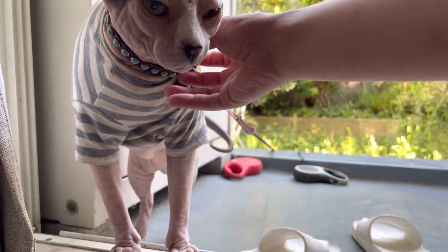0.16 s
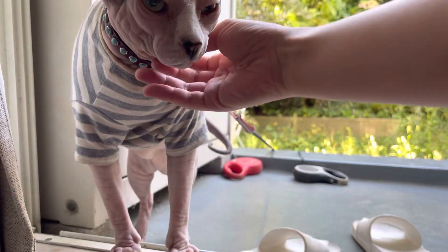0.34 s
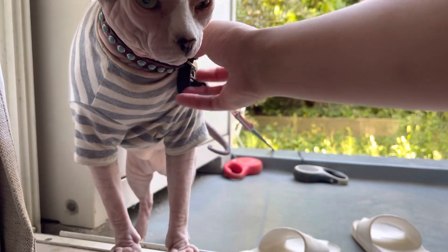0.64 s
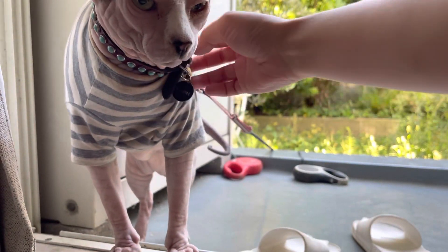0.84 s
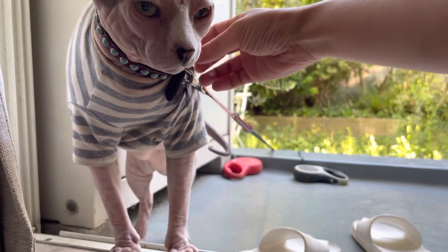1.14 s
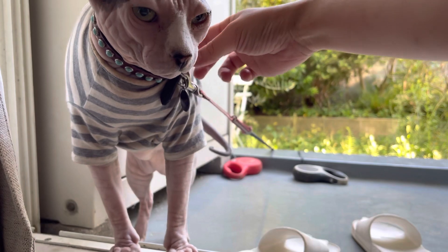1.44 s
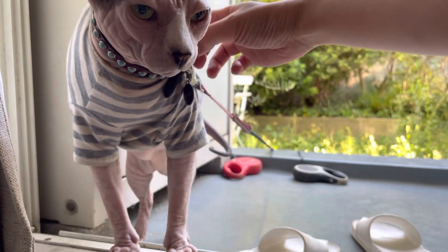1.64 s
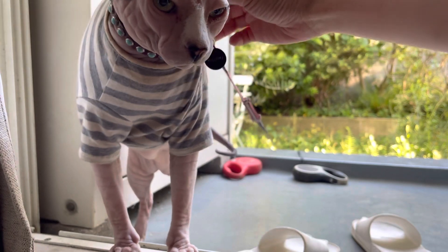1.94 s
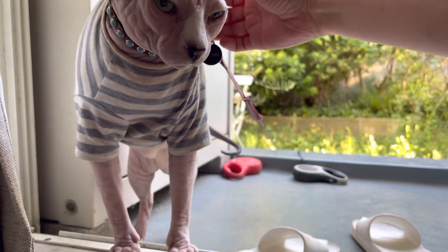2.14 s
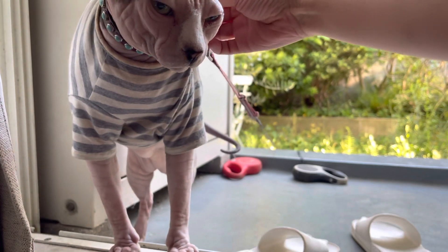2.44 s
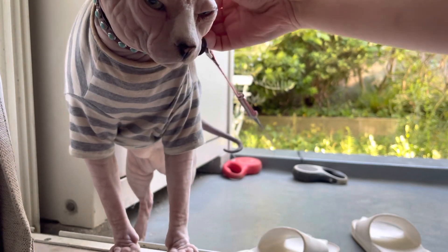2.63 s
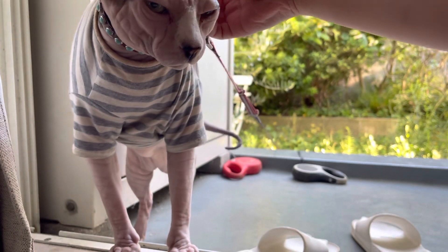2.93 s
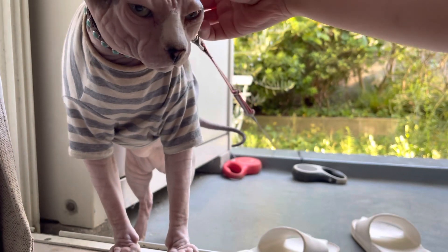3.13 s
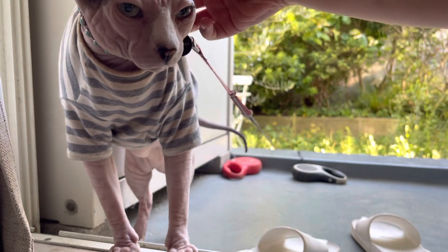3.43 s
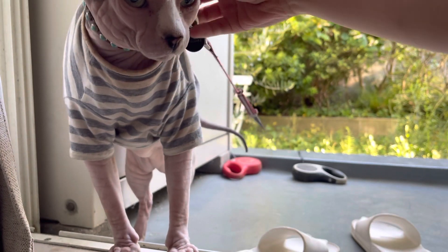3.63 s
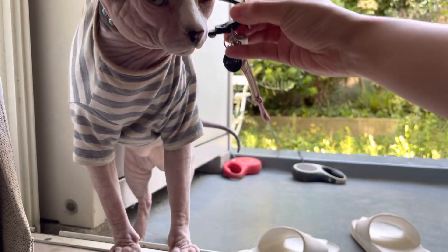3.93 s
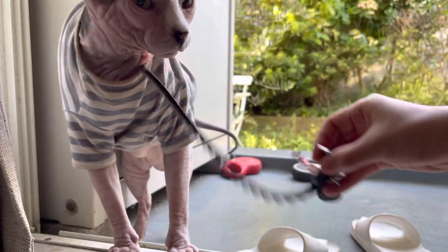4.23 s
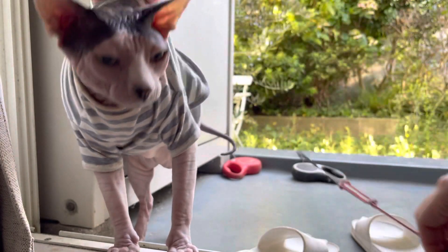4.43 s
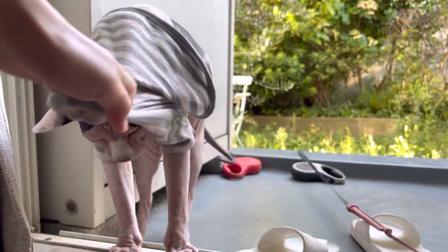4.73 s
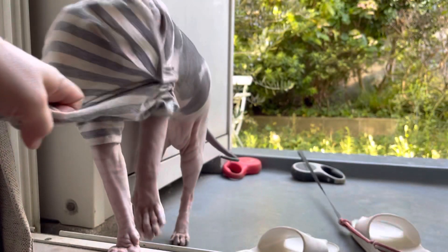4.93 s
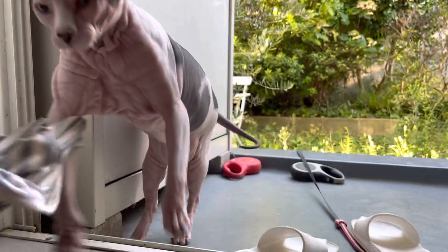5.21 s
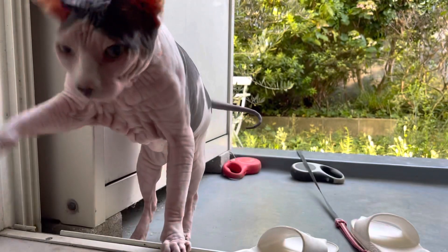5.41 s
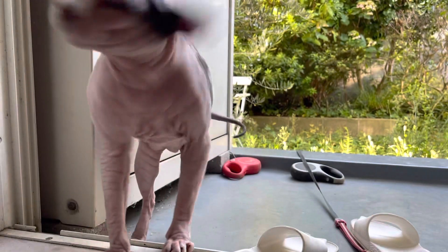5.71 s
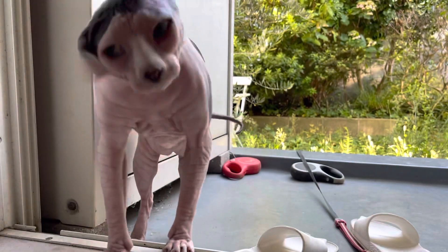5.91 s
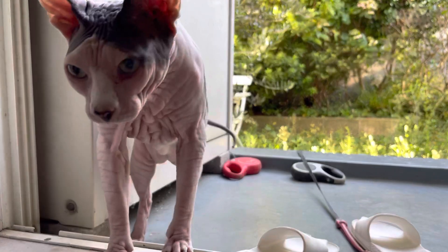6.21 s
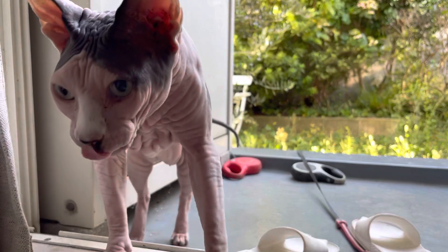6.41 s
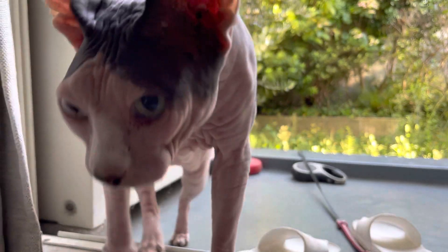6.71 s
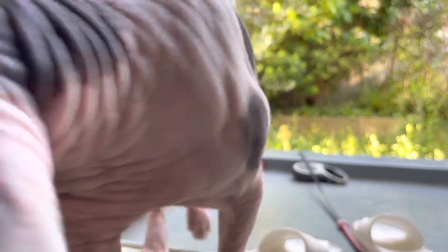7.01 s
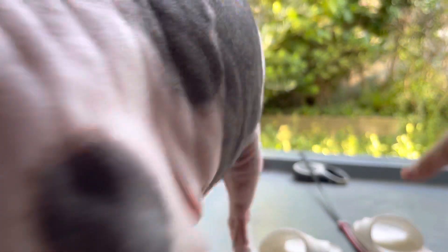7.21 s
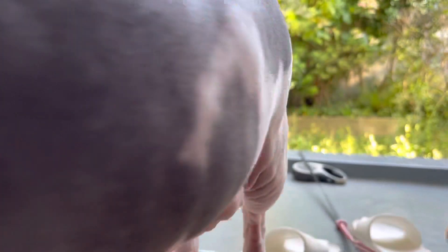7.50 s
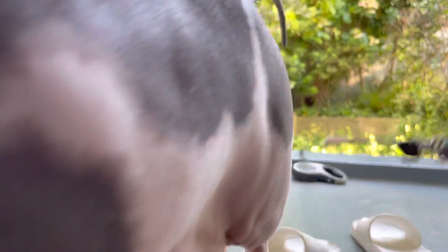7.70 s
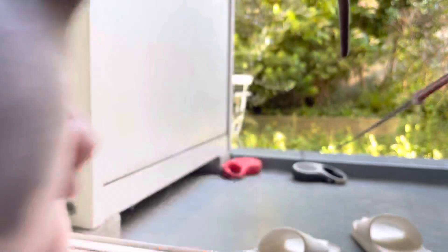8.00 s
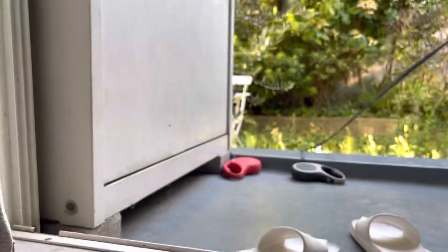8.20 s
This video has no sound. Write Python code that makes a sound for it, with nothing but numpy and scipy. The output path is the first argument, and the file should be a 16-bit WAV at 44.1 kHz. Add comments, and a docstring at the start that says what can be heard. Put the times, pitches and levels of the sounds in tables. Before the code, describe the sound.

Quiet doorway with light tag jingles and a low passing engine, then sharp buckle clatter, scraping, cloth rustle, claw clicks and a soft paw thud.

```python
"""Cat sheds collar and shirt in a balcony doorway.

A hand takes them off: the tag ticks, the collar drops, its buckle and leash clip clack and drag over the hollow sill.
Cloth rustles; claws click and paws thud as the cat steps in. Outside a motor vehicle pulls away, an insect chirps
faintly and a fan hums. Hits are noise bursts plus decaying modes, rubs and air are shaped noise, the engine and fan
are sines; a short tail and two microphone ports follow."""
import sys
import numpy as np
from scipy import signal
from scipy.fft import rfft, irfft, next_fast_len
from scipy.io import wavfile
from scipy.ndimage import map_coordinates

SR = 44100
rng = np.random.default_rng(int(sys.argv[2]) if len(sys.argv) > 2 else 0)


def output_pcm(signal):
    """Save a mono or channel-first signal as 16-bit PCM at the path in sys.argv[1].

    Samples are clipped to [-1, 1] before scaling.
    """
    pcm = np.clip(np.atleast_2d(signal).T, -1, 1) * 32767
    wavfile.write(sys.argv[1], SR, np.round(pcm).astype(np.int16))


N = 368235
AGE_S = np.arange(SR // 6) / SR  # time since a contact
SIDES = np.array([[.5], [-.5]])  # left and right share of a difference between the ports


def amp(db):
    """Decibels to amplitude."""
    return 10 ** (np.asarray(db) / 20)


def unit(x):
    """Scale to rms 1."""
    return x / np.sqrt(np.mean(x ** 2) + 1e-20)


def along(points, hz):
    """Interpolate (Hz, value) points on a log axis."""
    f, v = np.transpose(points)
    return np.interp(np.log(hz + 1), np.log(f + 1), v)


def curves(rows):
    """One value per sample for each column after the time."""
    s, *cols = np.transpose(rows)
    return [np.interp(np.arange(N) / SR, s, c) for c in cols]


def wobble(rate_hz, size=16):
    """A smooth random curve with rate_hz knots a second."""
    coarse = np.arange(0, N, size)
    knots = rng.standard_normal(int(N * rate_hz / SR) + 4)
    return np.interp(np.arange(N), coarse, map_coordinates(knots, [coarse * rate_hz / SR]))


def filtered(x, response):
    """Multiply the spectrum of x by a response of frequency."""
    m = next_fast_len(N + SR // 2)
    return irfft(rfft(x, m) * response(np.fft.rfftfreq(m, 1 / SR)), m)[..., :N]


def pair(width, size):
    """White noise for two ports; width is side over mid."""
    mid, side = rng.standard_normal((2, size))
    return np.array([mid + width * side, mid - width * side])


def coloured(x, spectrum):
    """x shaped by a spectrum, at rms 1."""
    return unit(filtered(x, lambda hz: amp(along(spectrum, hz))))


def swell(start_s, length_s, attack_s, release_s):
    """An envelope that rises linearly, holds to the end of its length and dies away exponentially."""
    t = np.arange(N) / SR - start_s
    return np.clip(t / attack_s, 0, 1) * np.exp(-np.clip((t - length_s) / release_s, 0, 50))


def swells(rows, attack_s, release_s):
    """The joint envelope of (start, length, dB) rows, summed as power."""
    power = sum((amp(db) * swell(start_s, length_s, attack_s, release_s)) ** 2 for start_s, length_s, db in rows)
    return np.sqrt(power)


def blow(x):
    """Scale a hit to the energy of 10 ms at rms 1."""
    return x / np.sqrt(np.mean(np.sum(x ** 2, axis=-1)) / (SR / 100) + 1e-20)


CONTACT_RISE_S, SNAP_DB = .0004, 13


def crack(lo_hz, hi_hz, t60_s, after_db=-15, after_t60_s=0.12, width=0.51):
    """First contact and a burst in one band, followed by the diffuse answer of nearby surfaces."""
    direct = pair(width, len(AGE_S)) * amp(-60 * AGE_S / max(t60_s, .002))
    direct[:, SR // 1000] += amp(SNAP_DB)  # first contact
    after = pair(0.97, len(AGE_S)) * amp(after_db - 60 * AGE_S / after_t60_s)
    band = signal.butter(3, [lo_hz, min(hi_hz, SR / 2 - 1)], 'band', fs=SR, output='sos')
    rise = 1 - np.exp(-AGE_S / CONTACT_RISE_S)
    return blow(signal.sosfilt(band, (direct + after) * rise))


def ring(modes, scatter_db=3, detune=0.0038, attack_s=0.00032):
    """Decaying modes, struck at new strengths and slightly new pitches by each contact."""
    out = np.zeros((2, len(AGE_S)))
    for hz, db, t60_s in modes:
        phase = 2 * np.pi * hz * (1 + detune * rng.normal()) * AGE_S + rng.normal(0, 0.4, (2, 1))
        out += amp(db + scatter_db * rng.normal() - 60 * AGE_S / t60_s) * np.sin(phase)
    return blow(out * (1 - np.exp(-AGE_S / attack_s)))


def add(track, s, hit):
    """Place a hit at time s."""
    part = track[:, round(s * SR):][:, :hit.shape[1]]
    part += hit[:, :part.shape[1]]


# town air spectrum: (frequency [Hz], relative density [dB per Hz])
AIR_SPECTRUM = [(13, -47.5), (22, -11.5), (42, -6), (97, 1), (128, -5), (178, -3.5), (301, -18),
                (333, -11.5), (387, -18.5), (511, -25.5), (1470, -36.5), (1710, -41), (4560, -54),
                (7360, -49.5), (9000, -43.5), (11700, -71), (19800, -120)]
# fan tones: (frequency [Hz], mean level [dB])
FAN_TONES = [(89, -60), (175, -64.5), (334, -59.5), (363, -62.5)]
# distant traffic: (time [s], rise [dB]); the near-mono air takes half of it
TRAFFIC = [(0, -0.5), (2.2, 1.5), (5.5, 6.5), (6.3, 0.5)]
FIRST_CHIRP_S, CHIRP_PERIOD_S, CHIRPS = 0.196, .329, 7


def background():
    """Distant town air as shaped noise, a fan's wavering tones and a faint insect's noise pulses."""
    t = np.arange(N) / SR
    air = amp(-49.0 + 1.6 * wobble(6.2)) * coloured(pair(0.088, N), AIR_SPECTRUM)
    wide_spectrum = [(25, -31), (70, -11.5), (250, -5), (600, -10.5), (2500, -20.0), (5000, -29.5), (12000, -36.5)]
    wide = amp(-61.5) * coloured(pair(0.63, N), wide_spectrum)
    fan = np.zeros(N)
    for hz, db in FAN_TONES:
        level = amp(db + 1.3 * wobble(2.8)) * np.sqrt(2)
        fan += level * np.sin(2 * np.pi * hz * t + .5 * wobble(7.1))
    chirp_times_s = FIRST_CHIRP_S + CHIRP_PERIOD_S * np.arange(CHIRPS)
    chirping = sum(np.exp(-((t - s) / 0.034) ** 2) for s in chirp_times_s)
    chirp_noise = coloured(pair(0.59, N), [(5700, -61), (6250, 2), (6500, -9), (7000, -60)])
    insect = amp(-73) * chirping * chirp_noise
    town_db, = curves(TRAFFIC)
    return amp(town_db / 2) * air + amp(town_db) * wide + fan + insect


# exhaust harmonics: (frequency [Hz], relative level [dB])
PIPE_LEVELS = [(130, -7.5), (177, 4.5), (220, -3), (265, -2.5), (310, 3.5), (360, -7), (400, -6), (445, -6),
               (490, -6), (535, -3), (580, -6.5), (625, -9.5), (670, -5), (715, -8), (770, -16.5),
               (850, -12), (892, -2.5), (935, -12.5), (980, -10.5), (1050, -25), (1200, -15.5),
               (1340, -16.5), (1550, -18.5), (1750, -33.5), (2300, -17), (2600, -59)]
# engine: (time [s], firing rate [Hz])
FIRING_RATE = [(1.8, 45.57), (1.89, 48.5), (2.03, 57.9), (2.15, 71.55), (2.31, 82.24), (2.42, 86.7),
               (2.56, 88.34), (2.85, 89.06), (3.13, 87.64), (3.25, 89), (3.37, 97.9), (3.65, 101.6),
               (3.7, 100.5), (3.79, 90.5), (3.95, 84.8), (4.2, 79)]
ENGINE_ATTACK_S, ENGINE_RELEASE_S = .13, 0.12
FADE_HZ, LUG_HARMONICS_DB = 208, 3.5  # above FADE_HZ harmonics carry less far; load makes them louder


def harmonics(turn, firing_hz, near, labour, size=200):
    """The exhaust's upper harmonics; street echoes give each its own fading and its own phase at each port."""
    start_s, end_s = FIRING_RATE[0][0], FIRING_RATE[-1][0] + 2 * ENGINE_RELEASE_S
    span = np.arange(round(start_s * SR), round(end_s * SR))
    at = span[::size]
    drift = lambda: np.interp(at, np.linspace(at[0], at[-1], num=22), rng.standard_normal(22))
    out = np.zeros((2, N))
    for k in range(3, 56):  # multiples of half the firing rate
        hz = k * firing_hz[at] / 2
        carry = near[at] ** np.minimum((hz / FADE_HZ) ** 2, 6)  # high harmonics fade faster with distance
        gain = carry * amp(along(PIPE_LEVELS, hz) + 3.8 * drift() + LUG_HARMONICS_DB * labour[at])
        echo_phase = np.interp(span, at, rng.uniform(0, 2 * np.pi) + .9 * drift())
        phase = k * turn[span] + echo_phase + rng.normal(0, 0.54, (2, 1))
        out[:, span[0]:span[-1] + 1] += np.interp(span, at, gain) * np.sin(phase.astype(np.float32))
    return out


# street's carrying of the exhaust note: (frequency [Hz], gain [dB])
STREET_BOOM = [(45, -7), (52, 1), (61, -6), (72, -3), (77, -5), (85, 3), (90, -3.5), (98, 8.5), (104, -10)]
# roar spectrum: (frequency [Hz], relative level [dB])
ROAR_SPECTRUM = [(60, -28), (150, -14), (330, -8), (650, -8), (780, -14), (920, -8), (1100, -13),
                 (1500, -9.5), (1800, -16.5), (2300, -12.5), (2600, -17), (4500, -25.5), (8000, -25.5),
                 (12000, -40.5)]
# clatter, moving off and labouring: (start [s], length [s], level [dB])
CLATTER_BURSTS = [(1.83, 0.22, -58), (3.3, 0.24, -65)]
CLATTER_ATTACK_S, CLATTER_RELEASE_S = 0.028, 0.16
PULL_AWAY_S, DRIVE_S = 1.809, 2.21  # vehicle in earshot
NEAREST_S, PASS_S = 2.85, 1  # closest approach, time from there to 3 dB down
LUG_S, LUG_LENGTH_S, LUG_RAMP_S = 3.22, 0.5, 0.25  # labouring under load
LUG_SHARE, EASY_SHARE = 0.83, 0.091  # half order's share, labouring and otherwise
EXHAUST_DB, ROAR_DB, HARMONICS_DB = -37.5, -53, -53
LUG_LOSS_DB, LUG_ROAR_DB = 8, 4.5
LIFT_S, COAST_LOSS_DB = 3.72, 12.5  # throttle closes, note drops back
EXHAUST_PAN_DB, ROAR_UNEVEN_DB = 1.5, 0.7


def vehicle():
    """Exhaust note at the firing rate, uneven cylinders at half of it, roar and harmonics swelling by; clatter."""
    t = np.arange(N) / SR
    firing_hz, = curves(FIRING_RATE)
    present = swell(PULL_AWAY_S, DRIVE_S, ENGINE_ATTACK_S, ENGINE_RELEASE_S)
    near = 1 / np.hypot(1, (t - NEAREST_S) / PASS_S)
    labour = swell(LUG_S, LUG_LENGTH_S, LUG_RAMP_S, ENGINE_RELEASE_S)
    coasting = np.clip((t - LIFT_S) / ENGINE_RELEASE_S, 0, 1)
    half_share = EASY_SHARE + (LUG_SHARE - EASY_SHARE) * labour
    turn = np.pi * np.cumsum(firing_hz * (1 + 0.0021 * wobble(25))) / SR
    firing = np.sin(2 * turn)
    full_order = (1 - half_share) * amp(along(STREET_BOOM, firing_hz)) * firing
    half_order = half_share * amp(along(STREET_BOOM, firing_hz / 2)) * np.sin(turn)
    exhaust = np.sqrt(2) * (full_order + half_order)
    exhaust_db = EXHAUST_DB - LUG_LOSS_DB * labour - COAST_LOSS_DB * coasting + EXHAUST_PAN_DB * SIDES
    roar = coloured(pair(0.57, N) * (1 + 0.061 * firing), ROAR_SPECTRUM)
    roar_db = ROAR_DB + LUG_ROAR_DB * labour + ROAR_UNEVEN_DB * wobble(13)
    upper = amp(HARMONICS_DB) * harmonics(turn, firing_hz, near, labour)
    passing = present * near * (amp(exhaust_db) * exhaust + amp(roar_db) * roar + upper)
    clatter_spectrum = [(700, -29.0), (1000, -9.5), (1550, 5.5), (1850, -2.5), (2300, -0.5), (2800, -7.5), (4500, -24.5)]
    clatter = coloured(pair(0.74, N) * (1 + 0.16 * firing), clatter_spectrum)
    return passing + swells(CLATTER_BURSTS, CLATTER_ATTACK_S, CLATTER_RELEASE_S) * clatter


# strokes of skin, cloth and strap: (start [s], length [s], level [dB])
STROKES = [(.45, 0.65, -70.5), (1.4, 1.8, -74.5), (3.95, 0.85, -55.5), (4.85, 0.33, -51.5),
           (5.25, 0.46, -61), (6.9, 0.47, -70), (7.35, 0.36, -56.5), (7.75, 0.52, -56)]
# cloth spectrum: (frequency [Hz], relative level [dB])
CLOTH_SPECTRUM = [(1500, -6), (4000, -7.5), (7000, -4), (8500, 1), (11500, -1), (16000, -17.5)]
STROKE_ATTACK_S, STROKE_RELEASE_S = 0.098, 0.12
BRUSH_S, BRUSH_LENGTH_S, BRUSH_DB = 7.09, 0.16, -64  # skin brushing past


def rustle():
    """Skin, cloth and strap slide with a fine, uneven hiss."""
    sliding = swells(STROKES, STROKE_ATTACK_S, STROKE_RELEASE_S) * amp(0.67 * wobble(11.0))
    brushing = amp(BRUSH_DB) * swell(BRUSH_S, BRUSH_LENGTH_S, STROKE_ATTACK_S, STROKE_RELEASE_S)
    uneven = amp(1.7 * wobble(670) + 1.1 * wobble(79))
    cloth = sliding * coloured(pair(0.48, N) * uneven, CLOTH_SPECTRUM)
    skin = brushing * coloured(pair(0.76, N), [(2000, -23.5), (5000, -5.5), (6500, 1), (10000, -13.0)])
    return cloth + skin


def push(hz):
    """A low sine with a slow onset and a short decay."""
    return blow(np.sin(2 * np.pi * hz * AGE_S) * (1 - np.exp(-AGE_S / 0.0087)) * amp(-60 * AGE_S / 0.068))


# claws on the door track: (time [s], ring level [dB], edge level before a 2.5 dB lift [dB])
CLAW_CLICKS = [(5.5, -59, -66), (5.545, -59.5, -70), (5.56, -60, -54), (5.616, -59.5, -68),
               (5.6848, -34, -47), (5.7474, -45, -51), (5.759, -51, -56), (5.8084, -31, -38.5),
               (5.8665, -44.5, -48), (5.8766, -59, -53), (5.9231, -63, -56), (6.712, -76, -62)]
# door track modes: (frequency [Hz], relative level [dB], t60 [s])
DOOR_TRACK_MODES = [(1600, -15, .016), (2280, 0, .024), (2420, -4, .02), (2950, -15, .014),
                    (4300, -14, .012)]
# dull taps of collar or frame: (time [s], level [dB])
DULL_TAPS = [(3.753, -55), (5.937, -53), (6.331, -61), (6.714, -56.5)]
# soft low thuds (paws, handling, collar landing, a low engine burst):
# (time [s], pitch [Hz], level [dB], overtone level [dB])
LOW_THUDS = [(2.276, 65.04, -32, -33), (3.791, 72.5, -36, -44), (4.039, 55.86, -38, -49),
             (4.319, 54, -45.5, -39), (4.356, 65.4, -43.5, -34), (5.272, 66.4, -37, -27.5),
             (5.6, 54.6, -39, -49.5), (7.051, 83.7, -28.5, -37.5)]
OVERTONE_RATIO = 2.04


def taps_and_thuds():
    """Claws excite the door track's modes drily, dull taps are band noise, soft low thuds are pairs of sines."""
    out = np.zeros((2, N))
    for s, ring_db, edge_db in CLAW_CLICKS:
        track = amp(ring_db) * ring(DOOR_TRACK_MODES, scatter_db=5.0, detune=0.0027)
        edge = amp(edge_db + 2.5) * crack(440, 11990, t60_s=0.014, after_db=-18.5, width=0.22)
        add(out, s, track + edge)
    for s, db in DULL_TAPS:
        add(out, s, amp(db) * crack(1100, 1820, t60_s=0.031, after_db=-24, width=0.23))
    for s, hz, db, overtone_db in LOW_THUDS:
        thud = amp(db) * push(hz) + amp(overtone_db) * push(OVERTONE_RATIO * hz)
        add(out, s, np.array([thud, thud]))
    return out


# pulls of the collar over the sill: (start [s], length [s], level before the rub and ring gains [dB])
PULLS = [(4.625, 0.22, -42), (4.865, 0.25, -42), (5.15, 0.078, -41), (7.335, 0.06, -54.5),
         (7.47, 0.12, -51.5)]
# rub spectrum: (frequency [Hz], relative density [dB per Hz])
SCRAPE_SPECTRUM = [(210, -48.5), (350, -14.5), (474, -12), (603, -6), (713, -21.5), (881, 0), (1210, -19),
                   (2150, -18), (4940, -26.5), (6390, -20.5), (7210, -23.5), (9460, -27.5), (11700, -28.5),
                   (12400, -37), (13000, -70.5)]
PULL_ATTACK_S, PULL_RELEASE_S = 0.019, 0.029
PULL_UNEVEN_DB, SLIP_UNEVEN_DB = 2, 3.4


def driven(grains, modes):
    """Modes kept ringing by noise: one resonance each, narrower for a longer t60."""
    response = lambda f: sum(amp(db) / (1 + 1j * (f - hz) * t60_s / 1.2) for hz, db, t60_s in modes)
    return unit(filtered(grains, response))


def drag():
    """Once down, the collar slides in a rub of tiny slips, which keep sill, clip and tag ringing."""
    pulling = swells(PULLS, PULL_ATTACK_S, PULL_RELEASE_S) * amp(PULL_UNEVEN_DB * wobble(34))
    grains = pair(.5, N) * amp(SLIP_UNEVEN_DB * wobble(500))
    sill = amp(-3.5) * driven(grains, HOLLOW_SILL_MODES)
    clip = amp(-25.0) * driven(grains, LEASH_CLIP_MODES)
    tag_ring = amp(-19.0) * driven(grains, METAL_TAG_MODES)
    rub = amp(-1.5) * coloured(grains, SCRAPE_SPECTRUM)
    return pulling * (rub + sill + clip + tag_ring)


# buckle and clip, low modes: (frequency [Hz], relative level [dB], t60 [s])
LOW_BUCKLE_MODES = [(1915, -1, .055), (2310, -1, .045), (2475, -2, .05), (2715, -3, .045), (3025, 1, .042),
                    (3270, 0, .05), (3758, -2, .035)]
# buckle and clip, high modes: (frequency [Hz], relative level [dB], t60 [s])
LEASH_CLIP_MODES = [(4530, 1, .035), (5050, -6, .04), (5440, -3, .04), (5950, -1, .035), (6450, 0, .04),
                    (6990, 1, .045)]
# tag modes: (frequency [Hz], relative level [dB], t60 [s])
METAL_TAG_MODES = [(8340, 3, .03), (8850, 1, .035), (9620, 0, .055), (11100, -2, .025)]


def metal(body_db, edge_db, shine_db, t60_s, after_db, ring_db):
    """A small metal part hits: a crack and short modes in each of three registers."""
    body = crack(1250, 3800, t60_s * 1.1, after_db)
    body = body + amp(ring_db) * ring(LOW_BUCKLE_MODES, scatter_db=1.5, detune=0.0088)
    edge = crack(4100, 9200, t60_s, after_db)
    edge = edge + amp(ring_db) * ring(LEASH_CLIP_MODES, scatter_db=3, detune=0.0059)
    shine = crack(7930, 13000, t60_s, after_db) + amp(ring_db) * ring(METAL_TAG_MODES)
    shine = shine + amp(-4.0) * crack(12000, 17000, t60_s / 2, after_db)
    return amp(body_db) * blow(body) + amp(edge_db) * blow(edge) + amp(shine_db - 2.5) * blow(shine)


# light touches of tag and ring:
# (time [s], body level [dB], edge level [dB], shine level before a 2.5 dB cut [dB], nominal t60 [s])
TAG_TOUCHES = [(0.6454, -55.5, -53, -43.5, 0.024), (.692, -63, -60, -47.5, 0.039),
               (0.7124, -62, -46.5, -34.5, 0.027), (.766, -69, -66, -58, .01), (.857, -69, -71, -60, .012),
               (1.168, -75, -76, -58, .012), (1.207, -64, -64, -64, 0.016), (1.7413, -65, -67, -53, .012),
               (1.92, -66, -74, -42.5, .013), (2.0427, -70, -63, -43.5, 0.017),
               (2.0654, -74, -57, -47.5, 0.015), (2.945, -68, -55, -46.5, 0.014),
               (2.9702, -66, -54.5, -43.5, .013), (3.719, -68, -67, -52.5, 0.0071),
               (3.7526, -56, -58, -44, 0.008), (4.051, -72, -52, -33.5, 0.0071),
               (4.0747, -68, -53, -51, .007), (4.2248, -62, -54.5, -40, .008),
               (4.328, -43.5, -50, -44.5, 0.02506), (4.366, -48.5, -54, -50, 0.0141),
               (4.615, -47, -40.5, -40, 0.014), (4.708, -61, -55, -52, .008),
               (4.734, -57, -55.5, -51.5, .008), (4.7926, -61.5, -44.5, -51, .008),
               (4.846, -49.5, -43.5, -36.5, 0.0093), (4.947, -48, -55, -53, .012),
               (5.018, -40, -41.5, -33.5, .012), (5.189, -61.5, -46, -39, 0.011),
               (5.27, -46.5, -49, -47, 0.0121), (5.473, -61, -73, -45, 0.013), (6.944, -76, -68, -61, .012),
               (7.392, -54, -53, -47.5, .01), (7.512, -44, -36, -32, .013), (7.601, -55, -52, -40, .014),
               (7.656, -65, -59, -46, 0.012), (7.923, -84, -53, -37.5, 0.018),
               (8.1082, -59, -50, -26, 0.0085), (8.141, -59, -53, -35, 0.011),
               (8.151, -62, -50, -35.5, .012), (8.1658, -62, -48, -31, 0.012)]
# clear notes left in tag, ring or buckle: (time [s], frequency [Hz], level [dB], t60 [s])
CLEAR_PINGS = [(.6452, 3240, -54, 0.019), (0.7103, 9500, -44, .02), (.774, 9560, -57, 0.044),
               (0.856, 9560, -53, 0.013), (2.964, 9550, -46, .012), (2.9696, 9450, -39.5, 0.014),
               (3.7531, 2900, -57, 0.014), (4.052, 6080, -49.5, 0.0098), (4.0745, 11550, -49, 0.01),
               (4.319, 2020, -29, .016), (4.5791, 10600, -34.5, .04), (4.58, 6730, -32, 0.023),
               (4.821, 9650, -26.5, 0.053), (4.856, 9570, -41.5, .04), (7.5555, 10440, -41, .04),
               (7.581, 10200, -23.5, .04), (8.1081, 11340, -27.5, 0.006), (8.143, 9650, -37, 0.052)]


def tag():
    """Tag and ring touch as the collar is handled; a part that swings free gives one clear decaying mode."""
    out = np.zeros((2, N))
    for s, body_db, edge_db, shine_db, t60_s in TAG_TOUCHES:
        add(out, s, metal(body_db, edge_db, shine_db, t60_s=t60_s, after_db=-21.5, ring_db=-10))
    for s, hz, db, t60_s in CLEAR_PINGS:
        add(out, s, amp(db) * ring([(hz, 0, t60_s)], detune=.001))
    return out


# collar landing and bouncing: (time [s], thud level [dB], knock pitch [Hz], knock level [dB],
# body level [dB], edge level [dB], shine level before a 2.5 dB cut [dB])
LANDINGS = [(4.3183, -30, 596, -38.5, -33.5, -37, -13), (4.3565, -25.5, 900, -28.5, -35.5, -35.5, -29.5),
            (4.3883, -35.5, 1050, -37, -33.5, -33.5, -33), (4.4213, -36, 993, -34.5, -37, -58, -44.5)]
# floor modes: (frequency [Hz], relative level [dB], t60 [s])
BENDING_MODES = [(249, -4.5, 0.097), (367.5, -4, 0.16), (606, 5, 0.042), (810, -6.5, 0.13),
                 (1030, -12, 0.087)]
# bending wave: start and end pitch, time constant of the fall, time and spread of the peak
BEND_TOP_HZ, BEND_LOW_HZ, BEND_FALL_S, BEND_PEAK_S, BEND_SPREAD_S = 773, 120, .003, 0.0068, 0.011


def drop():
    """Collar lands and bounces; the floor's bending wave arrives treble first, so knocks sink into thuds."""
    out = np.zeros((2, N))
    bend_hz = BEND_LOW_HZ + (BEND_TOP_HZ - BEND_LOW_HZ) * np.exp(-AGE_S / BEND_FALL_S)
    bend_envelope = np.exp(-((AGE_S - BEND_PEAK_S) / BEND_SPREAD_S) ** 2 / 2)
    bend = blow(np.sin(2 * np.pi * np.cumsum(bend_hz) / SR) * bend_envelope)
    for s, thud_db, knock_hz, knock_db, body_db, edge_db, shine_db in LANDINGS:
        thud = amp(thud_db) * (bend + amp(-5) * ring(BENDING_MODES, scatter_db=2.5, detune=0.0049))
        knock_ring = ring([(knock_hz, 0, .011)], detune=.02)
        knock_crack = crack(0.5 * knock_hz, 1.4 * knock_hz, t60_s=0.013, after_db=-15.5, width=.3)
        knock = amp(knock_db) * blow(knock_ring + knock_crack)
        parts = metal(body_db, edge_db, shine_db, t60_s=0.018, after_db=-32, ring_db=-19.5)
        add(out, s, thud + knock + parts)
    return out


# hollow sill modes: (frequency [Hz], relative level [dB], t60 before a blow shortens it [s])
HOLLOW_SILL_MODES = [(555, -9, .06), (645, -1, .05), (716, -5, .11), (818, 1, .13), (902, 1, .17),
                     (1003, -9, .07)]
SPOT_HZ_PER_DB = 22  # a mode loses 1 dB per this distance from the spot's pitch
SILL_THUMP_DB, SILL_THUMP_RISE_S, SILL_THUMP_T60_S = -3.5, 0.0041, .024


def clack(body_db, edge_db, shine_db, sill_db, spot_hz):
    """Metal hits the sill; the spot sets the pitch of a hollow thump and picks the sill's modes."""
    modes = [(hz, db - abs(hz - spot_hz) / SPOT_HZ_PER_DB, t60_s * 0.6) for hz, db, t60_s in HOLLOW_SILL_MODES]
    thump = ring([(spot_hz, 0, SILL_THUMP_T60_S)], detune=0.0094, attack_s=SILL_THUMP_RISE_S)
    ringing = ring(modes, scatter_db=3.0, detune=0.0042, attack_s=.0012)
    knock = crack(.75 * spot_hz, 1.68 * spot_hz, t60_s=0.021)
    sill = amp(SILL_THUMP_DB) * thump + amp(-4.5) * ringing + amp(-9) * knock
    return amp(sill_db) * sill + metal(body_db, edge_db, shine_db, t60_s=0.022, after_db=-14.5, ring_db=-6.5)


# buckle and clip on the sill:
# (time [s], body level [dB], edge level [dB], shine level before a 2.5 dB cut [dB], sill level [dB])
SILL_BLOWS = [(4.579, -38, -28.5, -22, -42), (4.6352, -20, -21, -23.5, -22), (4.658, -41, -42, -36.5, -32),
              (4.821, -38, -31, -23.5, -40.5), (4.9853, -47, -47, -40, -35), (5.0032, -45, -33.5, -37, -36),
              (5.027, -41, -33, -29, -39), (5.0329, -24, -19, -21.5, -23.5),
              (5.077, -30.5, -29, -29, -31.5), (5.12, -45, -46, -29.5, -57), (5.128, -40.5, -38, -32, -55),
              (5.1462, -23, -26, -27, -28), (5.154, -27.5, -25.5, -28, -26.5), (5.169, -53, -40, -25, -44),
              (5.256, -38, -46, -46, -39), (7.458, -43, -34, -28.5, -53), (7.471, -25, -27.5, -28, -22.5),
              (7.476, -31, -29.5, -24, -24), (7.5234, -22.5, -16.5, -24, -22.5),
              (7.5558, -44, -29, -25, -56), (7.5796, -46, -31, -30.5, -57), (7.8075, -46, -36.5, -27, -61)]
# pitch favoured where the collar lies, shifting as the cat pushes past: (time [s], frequency [Hz])
SPOT_PITCH = [(5.3, 870), (7.47, 730), (7.53, 790), (7.56, 880)]
HARD_DB = -24.9  # a body level above this bounces once
REBOUND_S, REBOUND_LOSS_DB, REBOUND_SILL_LOSS_DB = .0115, 20.5, 6
CLACK_PAN_DB = -1.6  # left minus right


def clacks():
    """Buckle and clip strike the sill, a little to the right; the heaviest blows bounce once, weaker."""
    out = np.zeros((2, N))
    for s, body_db, edge_db, shine_db, sill_db in SILL_BLOWS:
        spot_hz = np.interp(s, *np.transpose(SPOT_PITCH))
        metal_db = np.array([body_db, edge_db, shine_db])
        add(out, s, clack(*metal_db, sill_db, spot_hz))
        if body_db > HARD_DB:
            rebound = clack(*(metal_db - REBOUND_LOSS_DB), sill_db - REBOUND_SILL_LOSS_DB, spot_hz)
            add(out, s + REBOUND_S, rebound)
    return out * amp(CLACK_PAN_DB * SIDES)


# doorway decay: (frequency [Hz], t60 [s])
DOORWAY_T60 = [(200, 0.068), (800, 0.22), (1500, 0.3), (4000, 0.038), (12000, 0.053)]


def room(x):
    """The doorway's short tail: noise decaying by frequency, different at each port, 5 ms late."""
    hz, t, z = signal.stft(rng.standard_normal((2, SR // 3)), SR, nperseg=256)
    decay = amp(-60 * t / along(DOORWAY_T60, hz)[:, None])
    tail = signal.istft(z * decay, SR, nperseg=256)[1]
    late = np.pad(tail, ((0, 0), (SR // 200, 0))) / np.linalg.norm(tail[0])
    return signal.fftconvolve(x, late, axes=1)[:, :N]


def scene():
    """Collar hits fill the doorway; tag, claws, taps and thuds are drier; the rest gets no tail."""
    hits = drop() + clacks()
    close = tag() + taps_and_thuds()
    tail = amp(-17.5) * room(hits + amp(-7.0) * close)
    return hits + close + tail + drag() + rustle() + vehicle() + background()


# overall treble response, notch near 10.25 kHz, steep loss above 12 kHz: (frequency [Hz], gain [dB])
TREBLE_RESPONSE = [(8800, -0.5), (9800, -1.5), (10250, -16), (10600, -1.5), (11200, 2), (12000, -8),
                   (12800, -18), (13800, -30.5), (15000, -12), (16000, -29)]
# phase between ports: (frequency [Hz], left minus right [rad])
PORT_PHASE = [(20, -0.12), (150, -0.11), (500, -0.64), (1000, -1.3), (2500, -0.83), (5500, -0.43),
              (7500, -1.2), (8700, -0.3), (11000, -0.85)]
# level between ports: (frequency [Hz], left minus right [dB])
PORT_LEVEL = [(100, -0.4), (700, -2), (2500, -2), (5000, -3), (8500, 1)]


def port_response(f):
    """The overall treble response at two ports, slightly apart in level and phase."""
    level = amp(along(TREBLE_RESPONSE, f) + SIDES * along(PORT_LEVEL, f))
    return level * np.exp(1j * SIDES * along(PORT_PHASE, f))


# port cavities: (frequency [Hz], width [Hz], relative in-phase level [dB], relative opposed level [dB])
PORT_CAVITIES = [(9180, 350, -3, 8), (10420, 370, -16.5, 18)]


def cavity_response(f):
    """Port cavities resonating in the treble, partly in opposition."""
    out = 0
    for hz, width_hz, same_db, opposed_db in PORT_CAVITIES:
        out = out + (amp(same_db) + 2 * SIDES * amp(opposed_db)) / (1 + 1j * (f - hz) / width_hz) ** 2
    return out


OVERLOAD, LOW_CUT_HZ, TOP_HZ = .88, 30., 16500


def record(dry):
    """Two ports and their cavities, soft overload of the hardest peaks, then the band limits."""
    heard = filtered(dry, port_response) + amp(-7.0) * filtered(dry.mean(axis=0), cavity_response)
    heard = heard / (1 + (heard / OVERLOAD) ** 4) ** .25
    return filtered(heard, lambda hz: (hz < TOP_HZ) * hz ** 3 / np.sqrt(hz ** 6 + LOW_CUT_HZ ** 6))


dry = scene()
out = record(dry)
output_pcm(out)
```